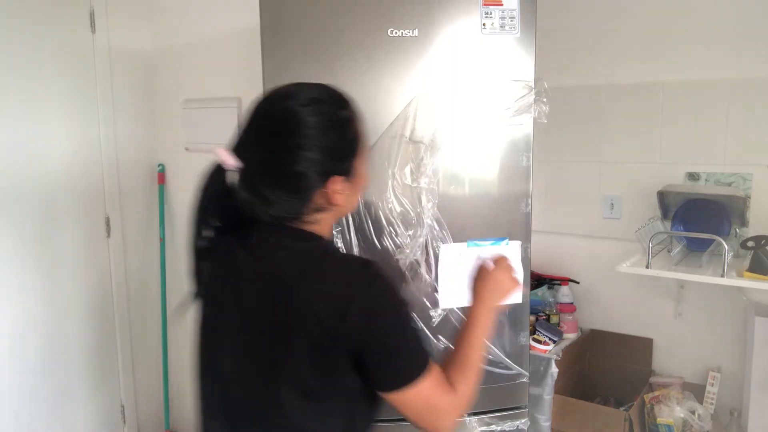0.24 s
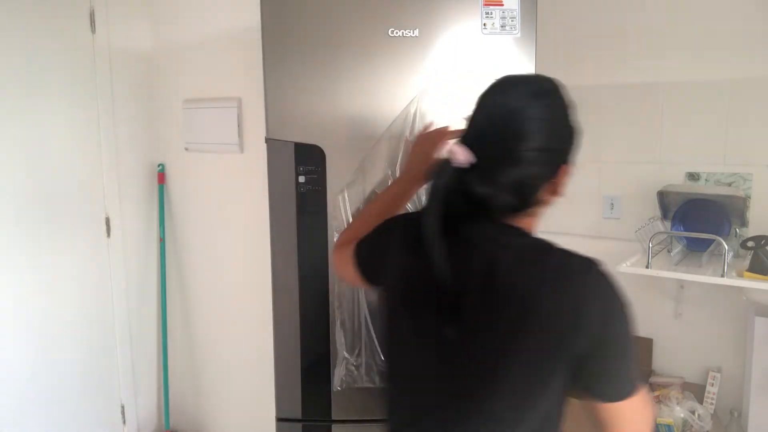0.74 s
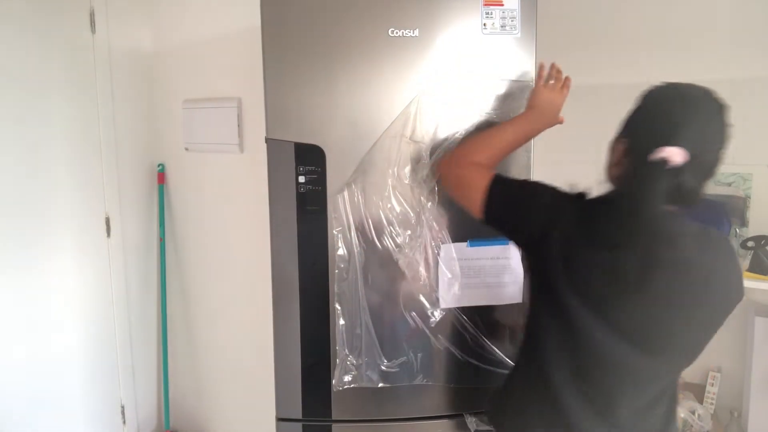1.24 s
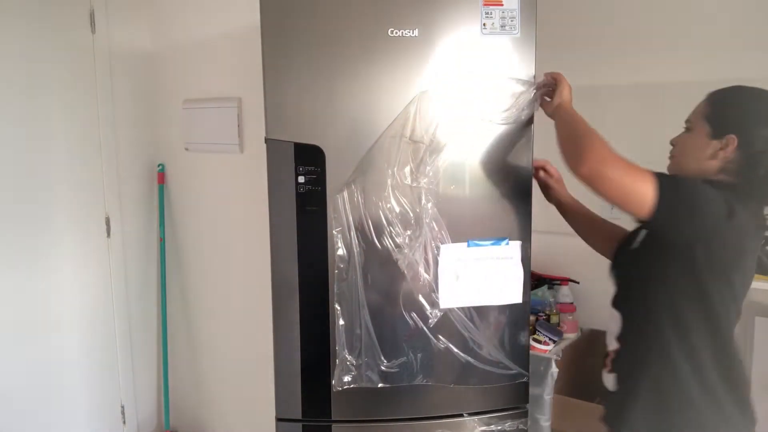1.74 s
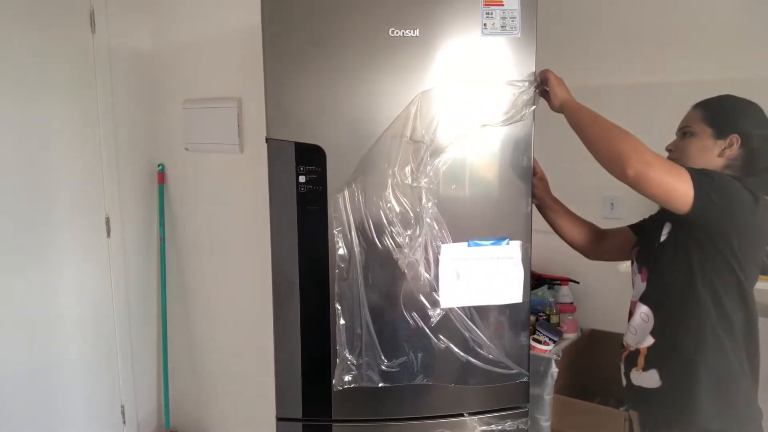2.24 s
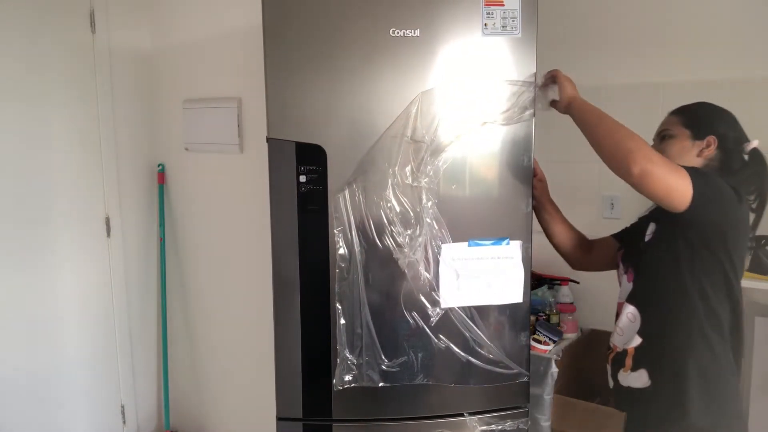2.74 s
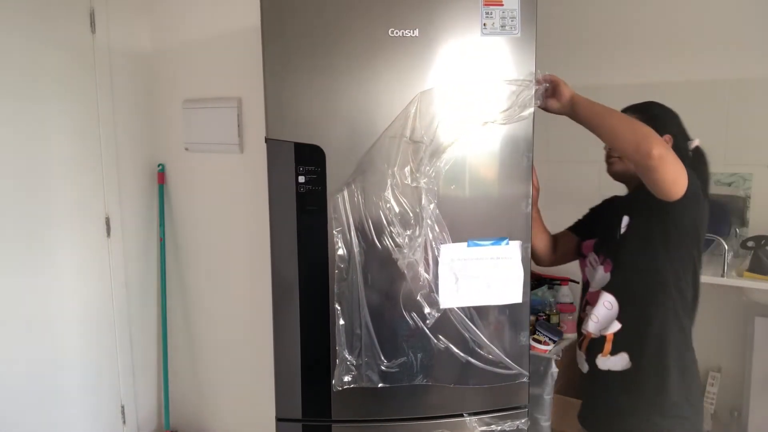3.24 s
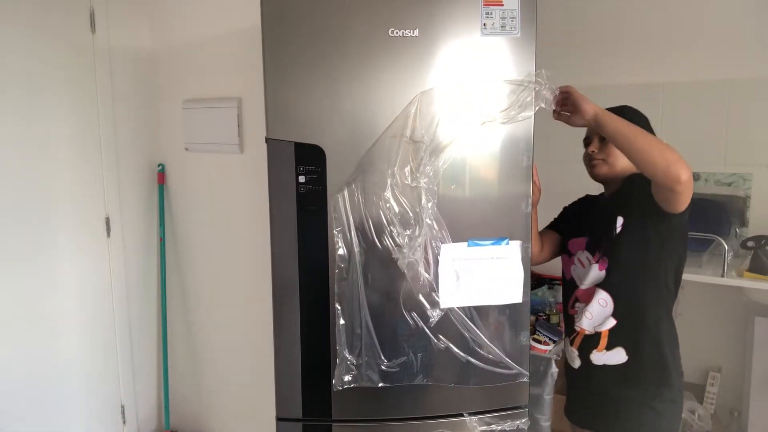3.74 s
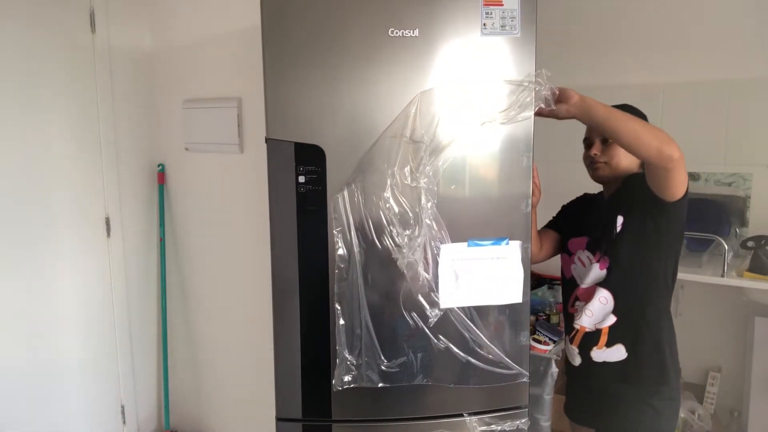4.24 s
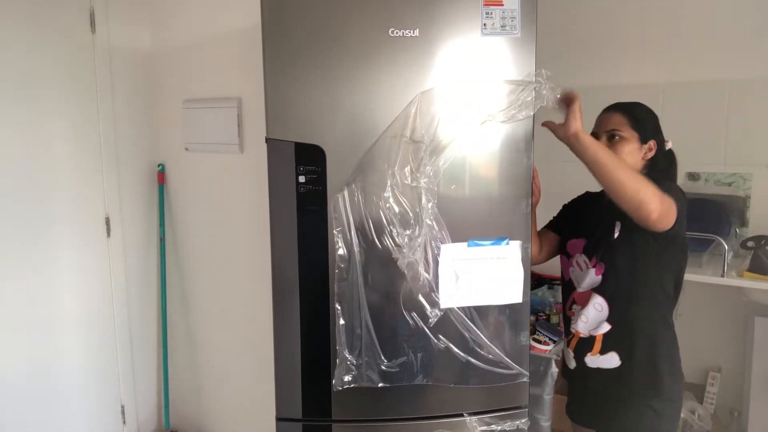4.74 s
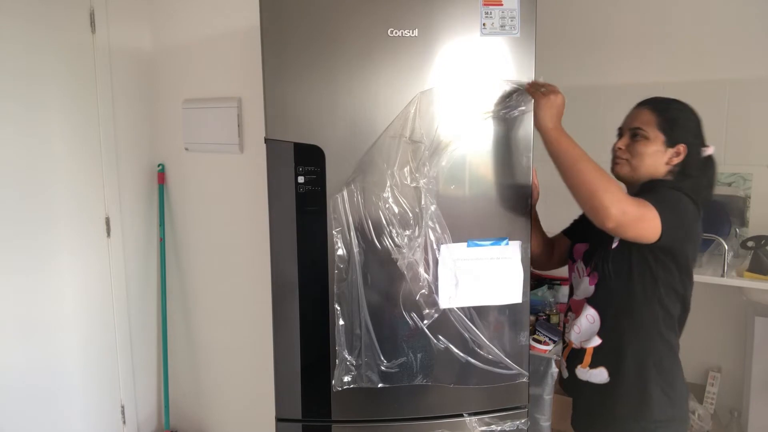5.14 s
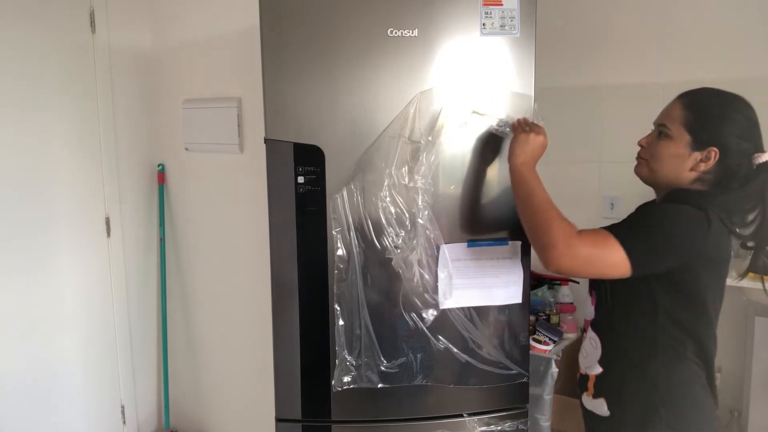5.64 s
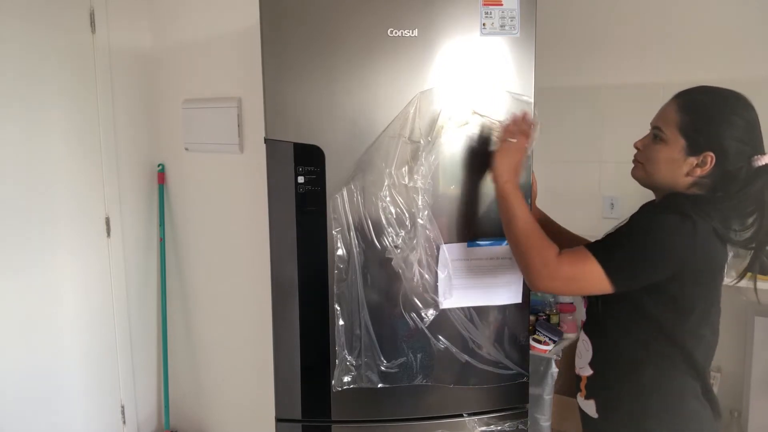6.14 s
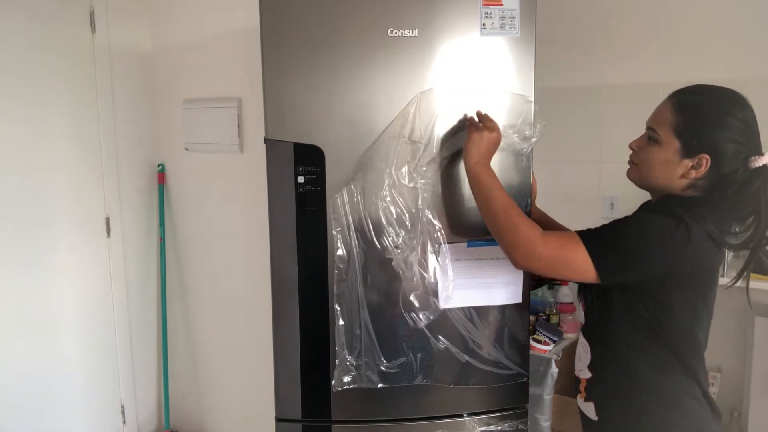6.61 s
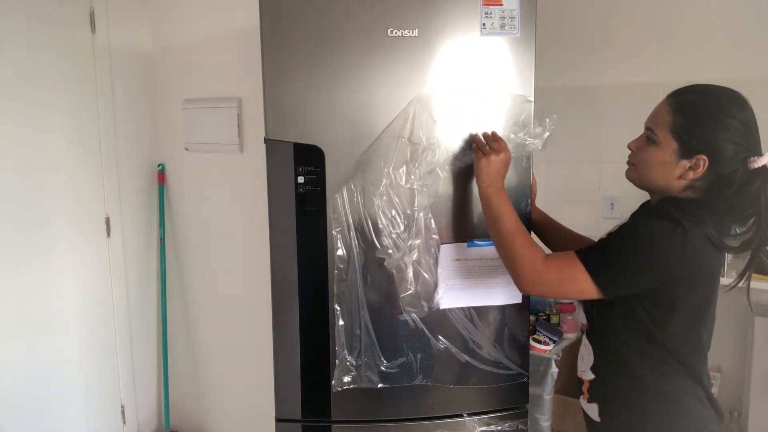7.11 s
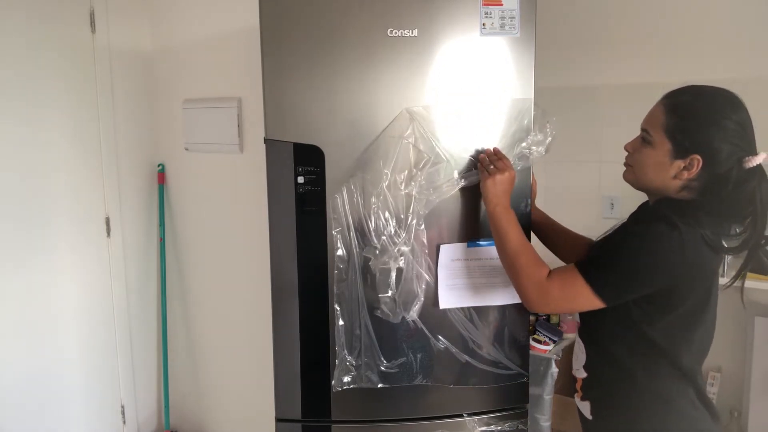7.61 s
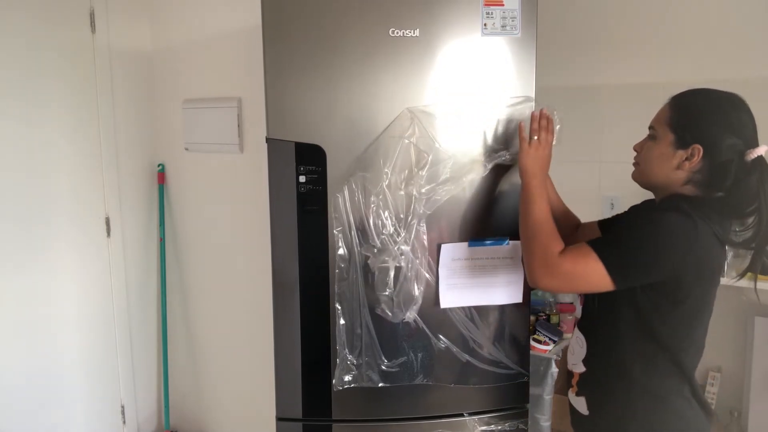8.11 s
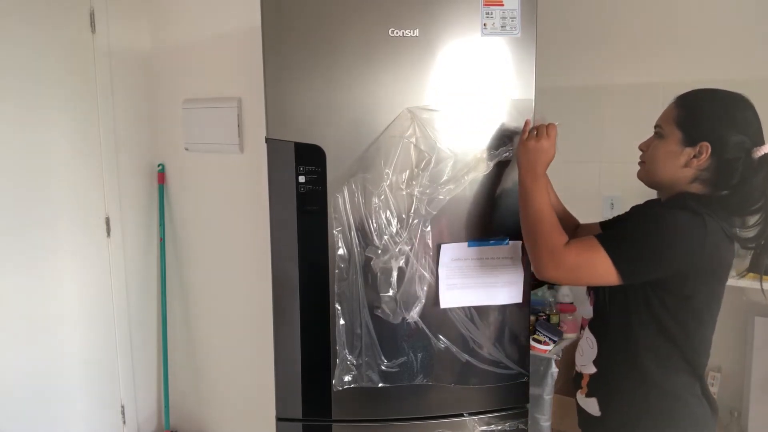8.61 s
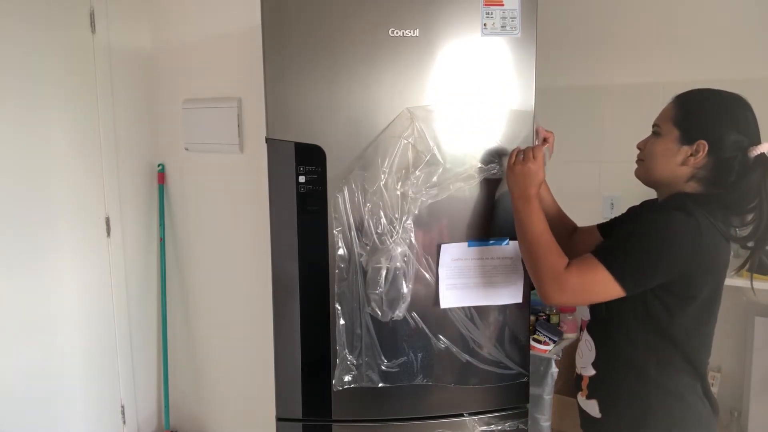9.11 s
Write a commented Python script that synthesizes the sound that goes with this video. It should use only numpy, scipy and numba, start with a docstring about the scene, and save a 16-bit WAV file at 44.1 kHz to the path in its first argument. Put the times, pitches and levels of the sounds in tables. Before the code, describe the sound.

In a bare, hard-walled kitchen with quiet air and a barely audible motor hum, hands brush and crumple thin plastic film. Small dry ticks come first, then short zips as glue lets go, then clusters of sharp, taut snaps, loudest around the later middle. Rustling fills the gaps, a dull bump lands on the door, and a final run of snaps rings away. The microphone is a few steps off, with lively room echo.

```python
"""Protective plastic film is pulled off a steel fridge door in a bare, tiled kitchen.
Over still air and a faint motor hum, a palm smooths the film and fingers crumple it: clicks buckle facets.
Then the glue lets go in single snaps and fast zipping runs: chirped clicks that ring the taut film.
Between pulls the loose film crinkles in the hands and soft bumps reach the door.
After a last run of snaps the room rings on: every film sound is convolved with decaying noise."""
import sys
import numpy as np
from scipy import signal
from scipy.fft import rfft, irfft
from scipy.io import wavfile
from scipy.ndimage import uniform_filter1d
from numba import njit

SR = 44100
rng = np.random.default_rng(int(sys.argv[2]) if len(sys.argv) > 2 else 0)


def waveform_to_disk(signal):
    """Save audio, clipped to [-1, 1], as 16-bit WAV at the path in sys.argv[1]."""
    frames = np.transpose(np.atleast_2d(signal))
    scaled = np.clip(frames, -1, 1) * 32767
    samples = np.round(scaled).astype(np.int16)
    wavfile.write(sys.argv[1], SR, samples)


N = 412776
TIME = np.arange(N) / SR
CLICK_LEAD_S = .002

# spectrum of loose film buckling: freq_hz, gain_db
CRINKLE_COLOUR = [(88, -41.5), (150, 1), (309, 0.5), (524, -3), (689, -2), (888, -3.5), (1170, -1.5),
                  (1980, -5.5), (3620, -4.5), (7770, -5), (14800, -11), (16000, -9.5)]


def undb(db):
    """Decibels to gain."""
    return 10 ** (np.asarray(db) / 20)


def unit(x):
    """Scale to an energy of one."""
    return x / np.sqrt(np.sum(x ** 2) + 1e-18)


def level(x):
    """Scale to an rms of one."""
    return unit(x) * np.sqrt(len(x))


def along(points, hz):
    """Read (Hz, value) points on a log-frequency axis."""
    point_hz, value = np.transpose(points)
    return np.interp(np.log(hz + 1), np.log(point_hz), value)


def convolve(x, response):
    """Filter with an impulse response, keeping the length."""
    return signal.fftconvolve(x, response)[:len(x)]


def colour(x, points, size=4096):
    """Minimum-phase filter through (Hz, dB) points, by folding the cepstrum."""
    gain = undb(along(points, np.fft.rfftfreq(size, 1 / SR)))
    cepstrum = irfft(np.log(gain))
    cepstrum[1:size // 2] *= 2
    cepstrum[size // 2 + 1:] = 0
    return convolve(x, irfft(np.exp(rfft(cepstrum))))


def balance(x, bass_db, treble_db):
    """Set bass and treble, each at unit rms, against a middle band of rms one."""
    hz = np.fft.rfftfreq(len(x), 1 / SR)
    low = 1 / (1 + (hz / 620) ** 8)
    high = 1 - 1 / (1 + (hz / 6800) ** 8)
    spectrum = rfft(x)
    bass, middle, treble = (level(irfft(spectrum * band, len(x))) for band in (low, 1 - low - high, high))
    return undb(bass_db) * bass + middle + undb(treble_db) * treble


def disperse(x, cycles, knee_hz=120):
    """Bending waves in a sheet: high notes arrive first, so each click chirps downwards."""
    hz = np.fft.rfftfreq(len(x), 1 / SR)
    phase = -2j * np.pi * cycles * np.log(1 + hz / knee_hz)
    return irfft(rfft(x) * np.exp(phase), len(x))


def add(out, start_s, sound):
    """Mix a sound in at a time."""
    i = max(int(start_s * SR), 0)
    out[i:i + len(sound)] += sound[:N - i]


def walk(rate):
    """Random wander: rate normal draws a second, joined by straight lines."""
    steps = rng.standard_normal(N // 100)
    return np.interp(TIME * rate, np.arange(len(steps)), steps)


def latest(table):
    """At each moment, the event that began last: its age in s, then its other columns."""
    rows = np.array(table)
    begun = np.maximum(np.searchsorted(rows[:, 0], TIME) - 1, 0)
    start_s, *columns = (column[begun] for column in rows.T)
    return [TIME - start_s] + columns


def soften(gain, fade_s):
    """Round off the corners of an envelope."""
    return uniform_filter1d(gain, int(fade_s * SR) + 1)


def clicks(rate, spread_db, even_s):
    """Random impulses of spread sizes, rate a second, with power evened out over even_s."""
    size = undb(spread_db * np.minimum(rng.exponential(size=N), 4)) * rng.choice([-1, 1], N)
    train = size * (rng.random(N) < rate / SR)
    power = np.abs(uniform_filter1d(train ** 2, int(even_s * SR) + 1))
    return train / np.sqrt(power + 1e-4)


@njit
def resonance(x, hz, width_hz):
    """State-variable band-pass with a moving centre."""
    y, band, low = np.empty(len(x)), 0., 0.
    for i in range(len(x)):
        g, damping = np.tan(np.pi * hz[i] / SR), width_hz / hz[i]
        v = (band + g * (x[i] - low)) / (1 + g * (g + damping))
        band, low, y[i] = 2 * v - band, low + 2 * g * v, damping * v
    return y


def ring(x, hz, width_hz, db):
    """Lift one resonance of the film, fixed or moving, over the broadband sound."""
    return x + undb(db) * resonance(x, hz * np.ones(len(x)), width_hz)


def facets(low_hz, high_hz, rate, spread_db, even_s, count=6):
    """Patches of film of several sizes click on their own, each size with its pitch."""
    pitches_hz = np.geomspace(low_hz, high_hz, count)
    return level(sum(resonance(clicks(rate, spread_db, even_s), np.full(N, hz), hz / 2)
                     for hz in pitches_hz))


def crack(spectrum, hz, q, ring_db, cycles, size=4096):
    """One click of film after a short lead-in: coloured, pitched and chirping downwards."""
    click = 1. * (np.arange(size) == int(CLICK_LEAD_S * SR))
    return disperse(ring(colour(click, spectrum), hz, hz / q, ring_db), cycles)


def flutter(x, db, decay_s):
    """A sharp release is followed by a short rattle as the sheet comes to rest."""
    t = TIME[:len(x)]
    envelope = np.exp(-t / decay_s) * (1 - np.exp(-t / 0.00045))
    rattle = unit(rng.standard_normal(len(x)) * envelope)
    return level(x + undb(db) * convolve(x, rattle))


def background():
    """Still indoor air as coloured noise, and the wavering hum of a motor as sines."""
    # spectrum of the air: freq_hz, gain_db
    air_colour = [(20, -50), (40, -21), (52, -14), (68, -14.5), (82, -11.5), (100, -17.5), (150, -15),
                  (350, -18.5), (600, -22.5), (1000, -26), (3000, -34.5), (7700, -37.5), (8600, -46),
                  (15500, -41)]
    # motor hum: freq_hz, rms_db
    hum_tones = [(75.7, -66.5), (40.7, -74.5)]
    air = undb(-63.5) * level(colour(rng.standard_normal(N), air_colour))
    waver_rad = .5 * walk(rate=19)
    hum = sum(undb(db) * level(np.sin(2 * np.pi * hz * TIME + waver_rad)) for hz, db in hum_tones)
    return air + hum


def reverberation(build_s, size=256):
    """Diffuse echoes of hard walls build up, then die at a rate set by frequency, the top soonest."""
    # decay of the room: freq_hz, t60_s
    room_t60 = [(100, 0.89), (260, 0.68), (700, 0.59), (1840, 0.61), (4850, 0.57), (8000, 0.44),
                (14000, 0.28)]
    hz, t, cells = signal.stft(rng.standard_normal(SR), SR, nperseg=size)
    decay_db = -60 * t / along(room_t60, hz)[:, None]
    tail = signal.istft(cells * undb(decay_db), SR)[1][:SR]
    return unit(tail * (1 - np.exp(-TIME[:SR] / build_s)))


def kitchen(x, hold_s=.13, count=5):
    """The film keeps moving, so the echo pattern changes: count tails take turns of hold_s."""
    place = (TIME // hold_s) % count
    return sum(convolve(x * (place == k), reverberation(build_s=0.00033)) for k in range(count))


def door(x, ring_db):
    """Each tug rings the steel panel faintly: decaying sine modes."""
    # panel modes: freq_hz, relative_db, t60_s
    panel_modes = [(200, 1.5, 0.32), (271, -30, .4), (1068, 13, 0.13), (1180, -25, 0.46)]
    t = TIME[:SR]
    modes = sum(undb(db - 60 * t / t60_s) * np.sin(2 * np.pi * hz * t) for hz, db, t60_s in panel_modes)
    return x + undb(ring_db) * convolve(x, unit(modes))


def bumps():
    """Hands and tugs push the insulated door, which answers with a short, dull note."""
    # soft contacts: start_s, level_db, pitch_hz
    contacts = [(2.979, -53.5, 200), (4.678, -54, 322), (4.701, -55, 195), (7.113, -38.5, 87),
                (7.148, -50, 65), (7.835, -61, 269), (7.966, -57.5, 173), (8.085, -59, 416),
                (8.835, -49, 95)]
    out, t = np.zeros(N), TIME[:SR // 2]
    push = (1 - np.exp(-t / 0.0027)) * np.exp(-t / 0.012)
    push = push / push.max()
    for start_s, db, hz in contacts:
        add(out, start_s, undb(db) * push * np.sin(2 * np.pi * hz * t))
    return out


def handling():
    """Each move of the hand swells and dies away: (gain, bass dB, treble dB, pitch of the folds Hz)."""
    # hand moves on loose film: start_s, rise_s, release_s, relative_db, bass_db, treble_db, fold_hz
    moves = [(0.0, 0.0039, .05, -50.5, -9, -24, 1990), (0.83, 0.081, .08, -54, -20, -11, 1600),
             (0.93, 0.044, 0.048, -48, -21, -7.5, 2140), (1.15, 0.033, .06, -65, 0, -3, 2500),
             (1.63, 0.011, 0.3, -51, -10, -15, 2300), (1.895, 0.017, 0.077, -46, -21, -16, 2440),
             (1.975, 0.015, 0.29, -47, -9, -9, 2960), (3.14, 0.1, 0.082, -45, -9.5, -12.5, 1960),
             (3.333, 0.0079, 0.043, -34, -32, -8.5, 1940), (3.61, 0.014, 0.064, -40.5, -3, 2, 2300),
             (4.15, 0.0068, .06, -49, -13, -19, 1650), (4.275, 0.062, 0.025, -39, -13, -11, 2400),
             (4.63, 0.055, 0.051, -48, -5, -6.5, 2150), (5.0, 0.18, 0.027, -42, -14, -10, 2830),
             (5.81, 0.036, .06, -49.5, -15, -6.5, 3980), (6.05, 0.04, 0.059, -43.5, -7, 0, 2850),
             (6.33, .005, 0.05, -46.5, -8, -13, 1720), (6.39, 0.12, 0.028, -37, -8.5, -7, 2430),
             (7.67, 0.087, .2, -46, -8.5, -5, 2150), (8.065, 0.004, 0.095, -47.5, -8, -12, 2850),
             (8.25, 0.0092, 0.19, -43.5, -9, -8, 2540), (8.35, 0.061, 0.14, -44.5, -7.5, -6, 2460),
             (8.56, .012, 0.27, -53, -22, -7, 2500)]
    swell_db, fade_db = 9.5, 15  # over the rise, over the release
    age, rise, release, db, bass_db, treble_db, fold_hz = latest(moves)
    below_db = np.maximum(swell_db * (1 - age / rise), fade_db * (age - rise) / release)
    return soften(undb(db - below_db), fade_s=0.021), bass_db, treble_db, fold_hz


def crinkling():
    """Small facets and long folds of loose film buckle over the hiss of sliding."""
    # palm smooths first, then fingers grip and crumple: time_s, sliding_share (0-1, of power)
    sliding = [(1.25, 0.93), (1.4, 0.2)]
    gain, bass_db, treble_db, fold_hz = handling()
    buckles = facets(low_hz=1140, high_hz=11200, rate=60, spread_db=-1.5, even_s=0.063)
    folds = undb(-2.0) * clicks(rate=110, spread_db=9.5, even_s=0.056)
    hiss = rng.standard_normal(N)
    share = np.interp(TIME, *np.transpose(sliding))
    film = np.sqrt(1 - share) * level(buckles + folds) + np.sqrt(share) * hiss
    film = colour(disperse(film, cycles=0.835), CRINKLE_COLOUR)
    film = ring(film, fold_hz, width_hz=3900.0, db=13)
    return gain * balance(film, bass_db, treble_db)


def creases():
    """Single folds buckle with a light, dry tick, each at its own pitch: (direct, into the room)."""
    # a crease flips over: start_s, relative_db, treble_db, pitch_hz
    flips = [(0.2069, -49, 11, 2600), (1.4345, -40.5, -9, 1390), (1.499, -37.5, -8, 1580),
             (1.6398, -37, -9, 3200), (1.6781, -32, -13, 1660), (1.7764, -34, -6, 1480),
             (1.8035, -32, -12, 2620), (1.998, -37, -3, 3110), (2.3794, -33, -3, 2550),
             (2.4355, -35, -7, 1470), (2.6948, -27.5, -3, 1860), (2.939, -45, 12, 1660),
             (3.0351, -35.5, -2.5, 8250), (3.1634, -48, -21, 1480), (3.209, -25.5, -17, 2040),
             (4.273, -30.5, -11, 1400), (4.958, -40, -7, 6100), (4.993, -34.5, -24, 2260),
             (5.031, -31.5, -16, 2550), (6.0342, -31.5, -9, 4800), (6.0607, -26.5, -11, 3140),
             (6.0906, -25.5, -14, 8000), (6.288, -35, -9, 3530), (6.3709, -36, -2, 3730),
             (6.4764, -23, 10, 3870), (6.4931, -19, -2, 3100), (7.471, -41, -6, 7960),
             (7.5706, -29, -6, 6800), (7.657, -29.5, -10, 1460), (7.7109, -37, -18, 1350),
             (7.7459, -26.5, -12, 1030), (7.7807, -30.5, -4, 3600), (7.832, -24.5, -9, 2600),
             (7.9396, -36, -22, 1400), (8.0623, -33.5, 7, 1025), (8.1775, -33, -11, 1460),
             (8.252, -28.5, -5, 5140), (8.358, -30, -5, 2700), (8.374, -26.5, -1, 3300),
             (8.515, -31.5, -1, 1800), (8.5729, -36, -16, 1810), (8.7282, -36.5, -17, 5100),
             (8.8165, -32, -17, 1180)]
    direct, sent = np.zeros(N), np.zeros(N)
    for start_s, db, treble_db, hz in flips:
        tick = crack(CRINKLE_COLOUR, hz, q=2.2, ring_db=3, cycles=1.1)
        tick = balance(tick, bass_db=-16.5, treble_db=treble_db)
        # the pitch of the fold is clearest on the direct path
        beam = ring(tick, hz, width_hz=hz, db=0)
        add(direct, start_s - CLICK_LEAD_S, undb(db) * flutter(beam, db=12.0, decay_s=0.0014))
        add(sent, start_s - CLICK_LEAD_S, undb(db) * level(tick))
    return undb(-23.5) * direct, undb(-22.5) * sent


def pulling():
    """A pull runs until the hand stops, freeing a longer strip: (gain, bass dB, treble dB, ring Hz)."""
    # steady pulls: start_s, length_s, final_relative_db, swell_db, mid_bass_db, mid_treble_db, final_ring_hz
    pulls = [(2.7, 0.025, -37.5, 1, -17, -3, 1360), (3.422, 0.176, -23.5, 6, -13.5, -11.5, 920),
             (4.337, 0.11, -30.5, 1, -8.5, -7.5, 1240), (5.12, 0.14, -30, 11, -12, -5, 1200),
             (5.478, 0.092, -29.5, -4.5, -7, -5.5, 1090), (9.14, 0.056, -28.5, -1, -9.5, -6.5, 1160)]
    # as the strip lengthens its ring falls ever faster, its bass grows and its treble fades
    start_hz, bass_growth_db, treble_loss_db = 1600, 2.5, 1
    age, length, db, swell_db, bass_db, treble_db, end_hz = latest(pulls)
    freed = np.clip(age / length, 0, 1)
    active = (age >= 0) & (age < length)
    gain = soften(undb(db - swell_db * (1 - freed)) * active, fade_s=0.0091)
    bass_db = bass_db + bass_growth_db * (freed - .5)
    treble_db = treble_db - treble_loss_db * (freed - .5)
    return gain, bass_db, treble_db, start_hz + (end_hz - start_hz) * freed ** 2


def peeling():
    """The peel line sticks and slips hundreds of times a second; the freed film rings lower as it lengthens."""
    # spectrum of film under a steady pull: freq_hz, gain_db
    pull_colour = [(41, -38), (70, -15), (108, -15), (195, -4.5), (566, -6), (1370, -8), (2070, -8),
                   (3040, -5), (7730, -11), (16000, -20)]
    gain, bass_db, treble_db, ring_hz = pulling()
    slips = clicks(rate=420, spread_db=-1.0, even_s=.018)
    slips = slips + undb(-8.5) * clicks(rate=7000, spread_db=5, even_s=0.0048)
    slips = slips + undb(-0.5) * facets(low_hz=760, high_hz=6600, rate=150, spread_db=-1, even_s=0.069)
    # patchy glue makes the slips come in clumps
    slips = slips * undb(1.7 * walk(rate=130))
    film = colour(disperse(slips, cycles=1.1), pull_colour)
    film = ring(film, ring_hz, width_hz=300.0, db=4)
    # the whole stretched sheet drums underneath
    film = ring(film, hz=195., width_hz=37.0, db=-3.5)
    return gain * balance(film, bass_db, treble_db)


def snaps():
    """A patch of glue gives way and the taut film cracks like a small drum: (direct, into the room)."""
    # glue lets go at once: start_s, relative_db, bass_db, treble_db, crack_hz
    releases = [(2.446, -21.5, -4, -7, 1500), (2.504, -21.5, -9.5, -7, 1540), (2.572, -22, -4.5, -9, 1380),
                (3.336, -32.5, -25, -11, 1460), (3.414, -27.5, -8, -11, 1750), (4.14, -30.5, -6, -26, 1830),
                (5.21, -23.5, -19, -7, 1930), (5.37, -17.5, -5.5, -12.5, 1560),
                (5.433, -14, -7, -9.5, 1430), (5.467, -14.5, -25, -8.5, 1380),
                (5.509, -13.5, -17, -13, 1140), (5.567, -14, -12, -4.5, 1130), (5.9, -25.5, -28, 0, 3470),
                (6.527, -18, -9.5, -4.5, 3240), (6.676, -12.5, -9, -5.5, 1600),
                (6.706, -15, -7.5, -5, 2390), (6.876, -10.5, -10.5, -7.5, 3600),
                (7.107, -10.5, -12, -8.5, 1080), (7.148, -9.5, -15, -7, 975),
                (7.179, -8.5, -14.5, -8.5, 1060), (7.197, -13, -11, -5, 1010),
                (8.831, -14.5, -8.5, -5.5, 1120), (8.854, -16.5, -8, -9, 1170), (8.88, -14.5, -7, -8, 1500),
                (8.906, -15, -21, -9, 1200), (8.948, -15.5, -7, -6, 1370), (9.077, -18, -9, -5.5, 1230),
                (9.108, -15, -6, -8.5, 1400), (9.142, -15, -6, -10, 1710), (9.178, -17, -29, -17, 1000)]
    # spectrum of a snap: freq_hz, gain_db
    snap_colour = [(29, -36), (50, -24.5), (189, -0.5), (337, -7.5), (371, -2), (615, -9), (822, -7),
                   (905, -10.5), (1020, -7), (1500, -7.5), (3670, -8.5), (4560, -8), (5150, -6),
                   (13200, -11), (16000, -15.5)]
    # at first the film comes off the side of the door, which shades the direct path
    round_the_edge_s, shade_db = 3, -3.5
    direct, sent = np.zeros(N), np.zeros(N)
    for start_s, db, bass_db, treble_db, hz in releases:
        pulse = crack(snap_colour, hz, q=3.5, ring_db=4, cycles=1.6)
        # every snap drums the same sheet
        pulse = ring(pulse, hz=395, width_hz=270., db=-1)
        pulse = balance(pulse, bass_db, treble_db)
        # the flat sheet beams its middle notes straight ahead
        beam = ring(pulse, hz=2300., width_hz=3400., db=0)
        direct_db = db + shade_db * (start_s < round_the_edge_s)
        add(direct, start_s - CLICK_LEAD_S, undb(direct_db) * flutter(beam, db=2, decay_s=0.0069))
        add(sent, start_s - CLICK_LEAD_S, undb(db) * pulse)
    return undb(-16) * direct, undb(-19) * sent


def scene():
    """Film, hands and door sound directly and through one shared room."""
    snapped, snapped_room = snaps()
    ticked, ticked_room = creases()
    peeled = undb(-1) * peeling()
    crinkled = undb(-1.02) * crinkling()
    bumped = bumps()
    direct = snapped + peeled + ticked + crinkled
    # one early bounce off a near surface
    bounce = 0.09 * np.interp(TIME - .0027, TIME, direct, left=0)
    taut = door(snapped_room + peeled, ring_db=-31)
    room = kitchen(taut + ticked_room + undb(-1.5) * crinkled + undb(5.5) * bumped)
    return (undb(-3) * (direct + bounce + room) + bumped + background())[None]


def record(dry):
    """The recorder drops the deepest rumble and cuts the top."""
    rumble_cut = signal.butter(4, 34, "high", fs=SR, output="sos")
    top_cut = signal.ellip(10, .2, 70, 16000, fs=SR, output="sos")
    return signal.sosfilt(top_cut, signal.sosfilt(rumble_cut, dry))


dry = scene()
out = record(dry)
waveform_to_disk(out)
```